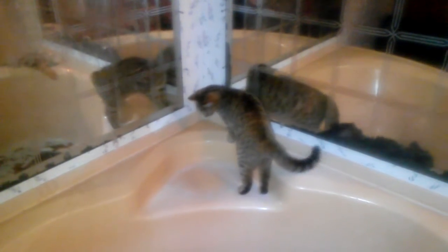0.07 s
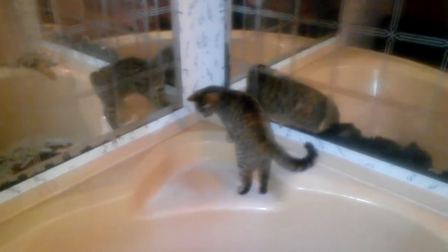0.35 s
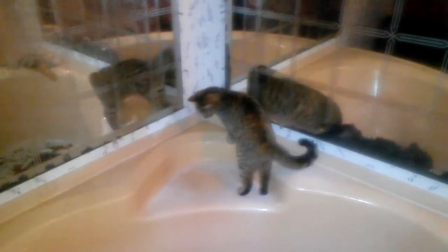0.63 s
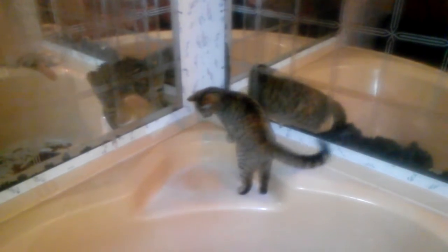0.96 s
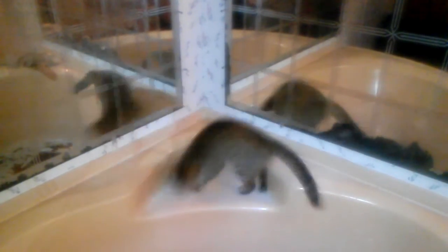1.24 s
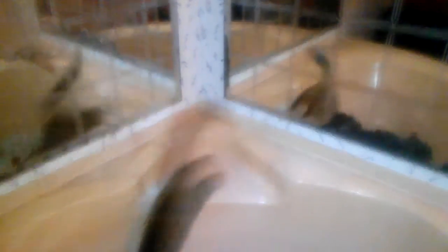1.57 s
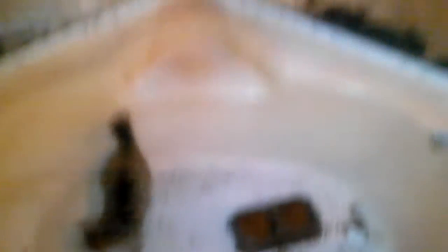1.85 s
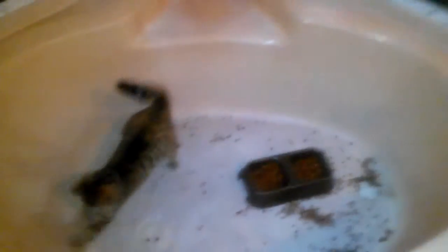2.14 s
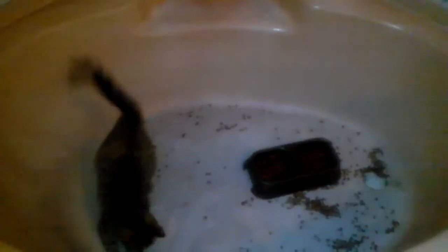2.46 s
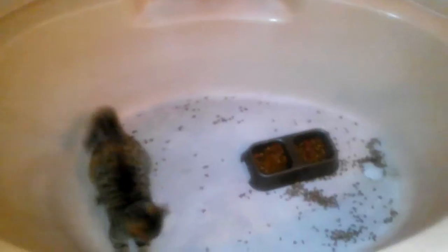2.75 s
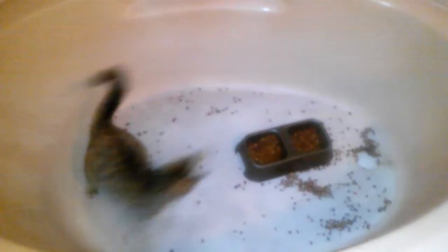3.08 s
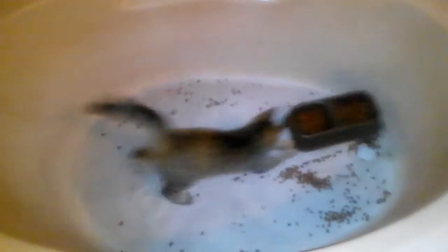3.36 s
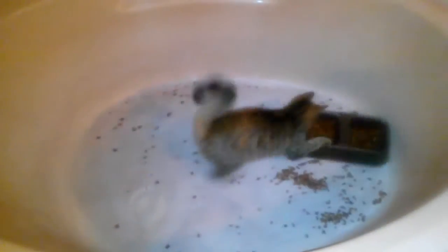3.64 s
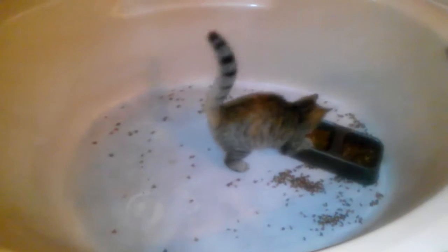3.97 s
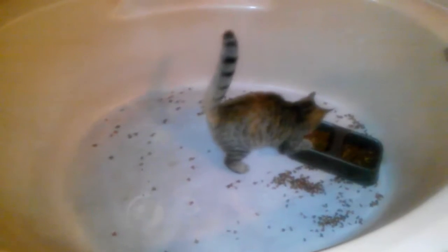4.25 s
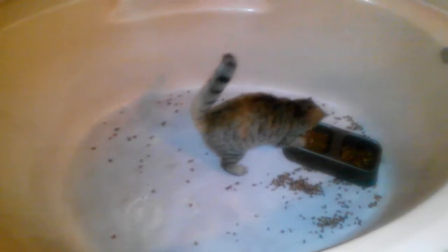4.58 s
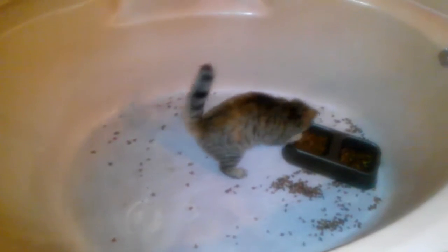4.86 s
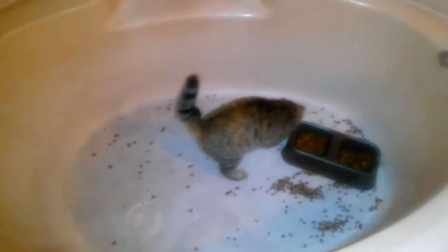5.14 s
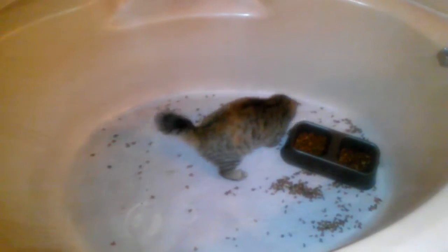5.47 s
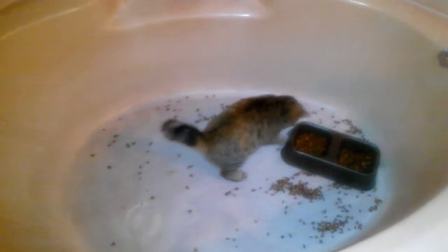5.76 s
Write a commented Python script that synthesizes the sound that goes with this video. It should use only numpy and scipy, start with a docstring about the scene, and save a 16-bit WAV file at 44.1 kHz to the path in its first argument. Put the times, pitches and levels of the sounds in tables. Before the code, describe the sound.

A kitten's paws thump into a hollow bathtub, then it shoves a clacking plastic dish and pokes at rattling dry kibble.

```python
"""An empty bathtub in a quiet tiled bathroom, on a small hand-held microphone just above the rim.
After a second a kitten jumps in: paws drum on the hollow shell and send spilt dry kibble ticking.
From three seconds it shoves a plastic dish along the bottom, which judders and clacks as the food rattles.
Just after four the microphone takes a dull double bump; then the kitten pokes at the food, ever more gently.
Tub and tiles ring after the contacts, and the microphone adds a sharp treble resonance."""
import sys
import numpy as np
from scipy import signal
from scipy.fft import rfft, irfft
from scipy.io import wavfile

SR = 44100
rng = np.random.default_rng(int(sys.argv[2]) if len(sys.argv) > 2 else 0)


def digitize_waveform(pressure):
    """Quantize a signal to 16-bit integers and store it at the path in sys.argv[1].

    Rows of a 2-D input are taken as channels; values are limited to [-1, 1].
    """
    field = np.atleast_2d(pressure).T
    bounded = np.clip(field, -1, 1)
    quanta = np.round(bounded * 32767).astype(np.int16)
    wavfile.write(sys.argv[1], SR, quanta)


N = 265375
T = np.arange(N) / SR
TAIL = T[:SR * 3 // 4]  # time axis of one contact and its ring


# Footfalls on the shell, a tub's depth below the microphone.
# Each row: start in seconds, slap and weight on the shell in relative dB, slap pitch in Hz.
FOOTFALLS = [(1.15, -49, -46.5, 247), (1.294, -39.5, -37, 260), (1.421, -63, -24, 275),
             (1.452, -24, -18, 350), (1.62, -17, -17, 545), (1.632, -9.5, -11.5, 576),
             (1.722, -23, -49, 603), (1.788, -25.5, -22, 1210), (1.831, -17, -15.5, 293),
             (1.996, -11, -18, 1450), (2.006, -23, -12, 910), (2.196, -13, -29, 1160),
             (2.208, -10, -17.5, 926), (2.394, -15, -18.5, 1730), (2.461, -12, -12.5, 636),
             (2.535, -24, -22, 390), (2.598, -29.5, -20, 307)]
# Modes of the hollow tub.
# Each row: frequency in Hz, level under a paw and under the dish in relative dB, t60 in seconds.
TUB_MODES = [(61, 2.5, -5, 0.15), (110.5, 0.5, -14.5, 0.13), (169.9, 2.5, -0.5, 0.23),
             (255, -7.5, -17.5, 0.17), (292, -10.5, -8.5, 0.1), (319, -10, 0, 0.16),
             (410.9, -22.5, -1.5, 0.2), (489.3, -20, 1, 0.37), (597.5, -9.5, -18.5, 0.12)]


def paws(boom_db=28, thud_db=23, hollow_db=19, slap_db=26, swell_s=0.019):
    """Each footfall slaps the dense upper modes of the shell; a thud and the low modes swell behind it."""
    out = np.zeros(N)
    for start, slap_level, weight, slap_hz in FOOTFALLS:
        detune = 1 + .03 * rng.standard_normal(len(TUB_MODES))
        modes = [(hz * shift, db + weight - (1 if hz < 130 else 0), t60)
                 for shift, (hz, db, _, t60) in zip(detune, TUB_MODES)]
        boom = undb(boom_db) * ring(modes)
        thud = undb(weight + thud_db) * unit(band(burst(t60=0.38), lo_hz=118, hi_hz=392))
        # the lower shell modes outlast the slap, so each knock falls in pitch
        low_hz = 0.56 * slap_hz
        low_octave = band(burst(t60=0.29), low_hz / np.sqrt(2), low_hz * np.sqrt(2), order=3)
        hollow = undb(slap_level + hollow_db) * unit(low_octave)
        add(out, start, (boom + thud + hollow) * (1 - np.exp(-TAIL / swell_s)))
        contact = strike(t60=0.13, wet_db=-5, hz=slap_hz, rise_s=0.00011)
        slap = unit(band(contact, slap_hz / 2.21, slap_hz * 1.55, order=3))
        add(out, start, undb(slap_level + slap_db) * slap)
    return out


# The dish knocking on the bottom of the tub.
# Each row: start in seconds, floor knock and plastic clack in relative dB.
DISH_KNOCKS = [(3.178, -14, -8), (3.23, -15.5, -11), (3.597, -31, -8), (3.615, -5.5, -9), (3.744, -16, -9),
               (3.782, -2, -11), (3.795, -5, -20), (3.829, -6.5, -32), (3.876, -11.5, -30),
               (4.943, -26, -23), (5.03, -50, -11.5), (5.199, -46, -24.5), (5.904, -37.5, -36),
               (5.924, -40.5, -28)]
# Modes of the plastic. Each row: frequency in Hz, level in relative dB, t60 in seconds.
DISH_MODES = [(873, -2, 0.019), (1011, 0, 0.073), (1115, -1.5, 0.068), (1242, -2, 0.037),
              (1382, -8.5, 0.044), (1741, -1, 0.019), (1933, -5, 0.021), (2530, -1.5, 0.0029)]


def dish(wall, judder, wall_db=-9.5, judder_db=-4, knock_db=21, clack_db=22, damped_db=4):
    """Pellets and knocks ring the plastic; its feet stick and slip, which drums on the tub floor."""
    on_plastic = undb(wall_db) * grains(wall, per_s=3000, spread_db=4.5)
    on_floor = undb(judder_db) * grains(judder, per_s=1200, spread_db=3)
    for start, knock_level, clack_level in DISH_KNOCKS:
        add(on_floor, start, undb(knock_level + knock_db) * burst(t60=0.038))
        add(on_plastic, start, undb(clack_level + clack_db) * burst(t60=0.04))
    plastic = through(on_plastic, unit(ring(DISH_MODES)))
    # right under the dish the floor is damped by its load and answers in a broad band
    damped = unit(band(signal.unit_impulse(len(TAIL)), lo_hz=210, hi_hz=554))
    free = unit(ring([(hz, db, t60) for hz, _, db, t60 in TUB_MODES]))
    tub_floor = through(on_floor, unit(free + undb(damped_db) * damped))
    return room(plastic + tub_floor, wet_db=-6, build_s=0.001)


# The heap of kibble, heard from the rim. Each row: frequency in Hz, spectral level in relative dB.
HEAP_SPECTRUM = [(150, -14), (600, -3.5), (1200, 2.5), (2500, -1), (4000, 0), (7500, -7.5), (11000, -10),
                 (15500, -13.5)]


def kibble(rattle, rattle_db=2):
    """Pellets heaped in the dish jostle each other in a dense rattle."""
    contacts = undb(rattle_db) * grains(rattle, per_s=3000, spread_db=4)
    return room(through(contacts, colour(HEAP_SPECTRUM)), wet_db=-6, build_s=0.002)


# The dish shoved along the bottom. Each row: time in seconds, rattle and judder in relative dB.
SHOVE = [(3.165, -43, -43.5), (3.179, -25.5, -9.5), (3.209, -33, -23.5), (3.237, -14.5, -10),
         (3.433, -13, -23), (3.529, -22, -37.5), (3.543, -20.5, -20), (3.639, -23.5, -14.5),
         (3.683, -18.5, -29), (3.735, -33, -35.5), (3.785, -24.5, -11), (3.923, -23.5, -23.5),
         (4.11, -80, -58)]
# Pokes at the dish. Each row: start, rise and hold in seconds, rattle and judder in relative dB.
POKES = [(4.42, 0.056, 0.012, -29.5, -23.5), (4.585, 0.027, 0.031, -29, -31.5),
         (4.632, 0.0065, 0.0087, -23, -30), (4.745, 0.03, 0.019, -40, -31.5),
         (4.86, 0.025, 0.022, -47, -38), (4.924, 0.004, 0.012, -21.5, -34), (4.97, 0.02, 0.057, -21.5, -53),
         (5.065, 0.02, 0.07, -39, -62), (5.191, 0.0041, 0.064, -29.5, -43.5),
         (5.345, 0.01, 0.022, -39.5, -50), (5.571, 0.0083, 0.015, -47.5, -51),
         (5.672, 0.016, 0.013, -50.5, -62), (5.705, 0.026, 0.031, -49, -56),
         (5.768, 0.01, 0.0082, -52.5, -58), (5.82, 0.019, 0.02, -46.5, -58),
         (5.899, 0.016, 0.02, -51.5, -38.5)]


def shove_and_pokes(settle_t60=0.15, wall_exponent=0.78, poke_wall_db=2.5):
    """The kitten's pushes move the heap, the plastic and the feet of the dish together."""
    shove, shove_judder = gains(SHOVE)
    poke, poke_judder = swells(POKES, settle_t60)
    # gentle pushes ring the plastic relatively more; a poke lands on it and rings it more than sliding
    wall = shove ** wall_exponent + undb(poke_wall_db) * poke ** wall_exponent
    return kibble(shove + poke) + dish(wall, shove_judder + poke_judder)


# Single pellets flicked against tub or dish. Each row: start in seconds, tick and body in relative dB.
FLICKS = [(1.6329, -13.5, -9.5), (1.7229, -29, -21.5), (1.8349, -3, -14), (1.8494, -8, -14),
          (2.0671, -8, -17), (2.148, -46, -19), (2.2027, -13.5, -16), (2.2264, -16, -15),
          (2.289, -17.5, -32), (2.3874, -9.5, -22), (2.395, -11, -10.5), (2.6194, -22.5, -26),
          (3.048, -21.5, -22), (3.176, -25, -7), (3.2228, -6.5, -4), (3.3906, 0.5, -15), (3.5461, -7, -12),
          (3.674, -7.5, -7.5), (3.7786, -9.5, -7.5), (3.823, -6.5, -10.5), (3.8898, -12, -10.5),
          (4.6471, -10.5, -26), (4.784, -24.5, -43), (4.9306, -12.5, -14.5), (4.9754, -5.5, -29),
          (4.9925, -5.5, -18), (5.018, -1.5, -21), (5.118, -11.5, -22), (5.1995, -7.5, -12.5),
          (5.2254, -9.5, -29), (5.3547, -26, -20.5)]
# A pellet's tick, then its body. Each row: frequency in Hz, spectral level in relative dB.
TICK_SPECTRUM = [(300, -35.5), (2500, -1), (6000, 2.5), (9000, -1), (12500, 4.5), (15500, -3)]
BODY_SPECTRUM = [(150, -28), (600, -5.5), (1200, 1), (3800, -4.5), (7000, -14.5), (14000, -28.5)]


def pellets(tick_db=16, body_db=21, skitter_t60=0.022):
    """Lone pellets hit and skitter: a bright tick and the duller body of what they strike."""
    ticks, bodies = np.zeros(N), np.zeros(N)
    for start, tick_level, body_level in FLICKS:
        tick = strike(skitter_t60, wet_db=-5, hz=11400, rise_s=0.0012)
        body = strike(skitter_t60, wet_db=1, hz=2620, rise_s=0.0015)
        add(ticks, start, undb(tick_level + tick_db) * tick)
        add(bodies, start, undb(body_level + body_db) * body)
    return through(ticks, colour(TICK_SPECTRUM)) + through(bodies, colour(BODY_SPECTRUM))


# Paws sliding over the tub wall and the crumbs.
# Each row: start, rise and hold in seconds, swish and rolling in relative dB.
PAW_SLIDES = [(1.02, 0.036, 0.16, -63.5, -64.5), (1.22, 0.13, 0.015, -50.5, -52.5),
              (1.4, 0.1, 0.08, -45.5, -49.5), (1.605, 0.028, 0.012, -26.5, -24),
              (1.776, 0.0082, 0.013, -20, -34), (1.84, 0.039, 0.04, -48, -35),
              (1.985, 0.014, 0.011, -25.5, -28), (2.12, 0.06, 0.13, -28, -32.5),
              (2.35, 0.05, 0.0077, -26, -26.5), (2.44, 0.049, 0.2, -40.5, -36),
              (2.69, 0.039, 0.12, -53, -40), (2.968, 0.021, 0.21, -39.5, -39)]


def paw_slides(swish_db=-5, rolling_db=-2, rest_t60=0.23):
    """Paws swish finely over the tub and set the spilt crumbs rolling."""
    swish_gain, rolling_gain = swells(PAW_SLIDES, rest_t60)
    swish = through(grains(swish_gain, per_s=12000, spread_db=4), colour(TICK_SPECTRUM))
    rolling = through(grains(rolling_gain, per_s=8000, spread_db=4), colour(BODY_SPECTRUM))
    return room(undb(swish_db) * swish + undb(rolling_db) * rolling, wet_db=-21, build_s=0.0016)


# Two bumps right at the microphone. Each row: start in seconds, level in relative dB.
BUMPS = [(4.1295, -30.5), (4.147, -32)]
# Rumble of the hand, strongest as it swings the microphone down after the kitten.
# Each row: time in seconds, level in dB.
HAND_RUMBLE = [(0.0, -58), (1.0, -60.5), (1.48, -35), (2.55, -38), (2.88, -52), (3.55, -35.5), (4.1, -50.5),
               (6.02, -50.5)]


def handling(bump_db=23, bump_hz=200, click_db=-6):
    """The hand-held housing rumbles, and takes dull, dry bumps."""
    bump = unit(np.cos(2 * np.pi * bump_hz * TAIL) * fade(t60=0.041))
    bump[0] += undb(click_db)
    bumps = np.zeros(N)
    for start, level in BUMPS:
        add(bumps, start, undb(level + bump_db) * bump)
    low_noise = band(rng.standard_normal(N), lo_hz=22, hi_hz=86.5)
    rumble = gains(HAND_RUMBLE)[0] * low_noise / low_noise.std()
    return band(bumps, lo_hz=84, hi_hz=2200, order=5) + rumble


# Fingers on the microphone housing. Each row: start, rise and hold in seconds, level in relative dB.
RUBS = [(0.33, 0.065, 0.026, -65.5), (0.72, 0.041, 0.053, -66), (4.14, 0.051, 0.092, -42.5)]
# Tone of that rub. Each row: frequency in Hz, spectral level in relative dB.
RUB_SPECTRUM = [(100, -26), (220, 1), (520, -2), (700, -9), (2200, -16), (7250, -29), (11500, -14.5),
                (15500, -25)]


def fingers(rub_db=-2):
    """Fingers shift on the housing with a soft, dry rustle."""
    friction = swells(RUBS, release_t60=0.31)[0] * rng.standard_normal(N)
    return undb(rub_db) * through(friction, colour(RUB_SPECTRUM))


# Room tone at the rim. Each row: frequency in Hz, spectral level in relative dB.
HUSH_SPECTRUM = [(25, 2), (65, 0), (120, -11), (200, -10), (400, -15.5), (1000, -21.5), (4000, -30),
                 (8000, -33.5), (11500, -37), (15500, -29.5)]


def hush(level_db=-59.5):
    """Faint steady air of a quiet bathroom."""
    return undb(level_db) * through(rng.standard_normal(N), colour(HUSH_SPECTRUM))


# Ring of tub and tiles all round the microphone. Each row: frequency in Hz, t60 in seconds.
ROOM_T60 = [(100, .35), (400, .37), (1100, .41), (4000, .36), (12000, .28)]


def room(x, wet_db, build_s, places=4, places_per_s=23):
    """Direct sound plus the ring of tub and tiles, crossfaded among places with their own reflections."""
    edges_hz = np.geomspace(50, SR * 3 / 7, num=8)
    out = x.copy()
    for k in range(places):
        tail = np.zeros(len(TAIL))
        for lo, hi in zip(edges_hz, edges_hz[1:]):
            t60 = on_log(np.sqrt(lo * hi), ROOM_T60)
            tail += band(rng.standard_normal(len(TAIL)), lo, hi, order=3) * fade(t60)
        reflections = unit(tail * (1 - np.exp(-TAIL / build_s)))
        away = np.minimum(abs((places_per_s * T - k) % places - places / 2), 1)
        out += undb(wet_db) * through(x * np.cos(np.pi / 2 * away), reflections)
    return out / np.sqrt(1 + undb(2 * wet_db))


def strike(t60, wet_db, hz, rise_s):
    """A brief noise burst whose tail lasts as long as the room rings at hz; energy of one."""
    power = unit(fade(t60)) ** 2 + undb(2 * wet_db) * unit(fade(on_log(hz, ROOM_T60))) ** 2
    return unit(rng.standard_normal(len(TAIL)) * np.sqrt(power) * (1 - np.exp(-TAIL / rise_s)))


def burst(t60):
    """A dying flurry of tiny contacts with an energy of one."""
    return unit(rng.standard_normal(len(TAIL)) * fade(t60))


def grains(gain, per_s, spread_db):
    """Random contacts with rms near gain; a stronger push makes bigger ones and more, up to per_s."""
    chance = np.clip(per_s / SR * (gain / gain.max()) ** .2, 1e-3, 1)
    size = undb(spread_db * np.clip(rng.standard_normal(N), -2, 2)) * rng.choice([-1, 1], N)
    return gain * (rng.random(N) < chance) * size / np.sqrt(chance * np.mean(size ** 2))


def ring(modes):
    """Response of (Hz, dB, t60) modes; neighbours swing against each other."""
    return sum((-1) ** k * undb(db) * unit(np.sin(2 * np.pi * hz * TAIL) * fade(t60))
               for k, (hz, db, t60) in enumerate(modes))


def swells(table, release_t60):
    """Rows (start, rise, hold, dB, ..) as one gain curve per dB column: ease in, hold, die away."""
    out = 0
    for start, rise, hold, *levels in table:
        attack = np.clip((T - start) / rise, 0, 1) ** 2
        release = np.exp(-np.log(1000) * np.maximum(T - start - rise - hold, 0) / release_t60)
        out = out + np.outer(undb(levels), attack * release)
    return out


def gains(table):
    """Rows (time, dB, ..) as one gain curve per dB column, silent before and after."""
    times, *columns = np.transpose(table)
    inside = (T >= times[0]) & (T <= times[-1])
    return np.array([undb(np.interp(T, times, db)) * inside for db in columns])


def colour(points, size=4096):
    """Minimum-phase response with the given spectral shape and an energy of one."""
    spectrum = undb(on_log(np.fft.rfftfreq(size, 1 / SR), points))
    cepstrum = irfft(np.log(spectrum))
    cepstrum[1:size // 2] *= 2
    cepstrum[size // 2:] = 0
    return unit(irfft(np.exp(rfft(cepstrum))))


def on_log(hz, points):
    """Read (Hz, value) points on a log-frequency axis."""
    point_hz, values = np.transpose(points)
    return np.interp(np.log(np.maximum(hz, 1)), np.log(point_hz), values)


def band(x, lo_hz, hi_hz, order=2):
    """Causal band-pass."""
    return signal.sosfilt(signal.butter(order, [lo_hz, hi_hz], "band", fs=SR, output="sos"), x)


def through(x, response):
    """Pass a sound through an impulse response."""
    return signal.fftconvolve(x, response)[:len(x)]


def add(out, start_s, sound):
    """Mix a sound in at a time."""
    i = int(start_s * SR)
    out[i:i + len(sound)] += sound[:N - i]


def fade(t60):
    """Exponential decay, 60 dB down after t60 seconds."""
    return np.exp(-np.log(1000) * TAIL / t60)


def unit(x):
    """Scale a response to an energy of one."""
    return x / np.sqrt(np.sum(x ** 2))


def undb(db):
    """Decibels to gain."""
    return 10 ** (np.asarray(db) / 20)


def scene():
    """Kitten, food, handling noise and room tone from just above the rim, in mono."""
    food = shove_and_pokes()
    return (paws() + pellets() + paw_slides() + food + handling() + fingers() + hush())[None]


def record(dry, port_hz=11255, port_width_hz=1150, port_gain=3.27, top_hz=15800):
    """The microphone port rings in the high treble, the loudest peaks clip and the top is cut."""
    port = signal.lfilter(*signal.iirpeak(port_hz, port_hz / port_width_hz, fs=SR), dry)
    clipped = np.clip(dry + port_gain * port, -1, 1)
    return signal.sosfilt(signal.ellip(10, .2, 70, top_hz, fs=SR, output="sos"), clipped)


dry = scene()
out = record(dry)
digitize_waveform(out)
```